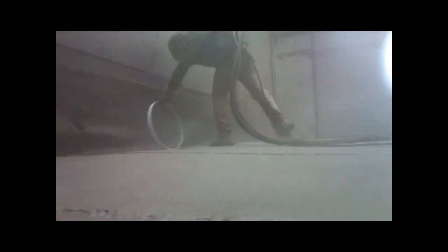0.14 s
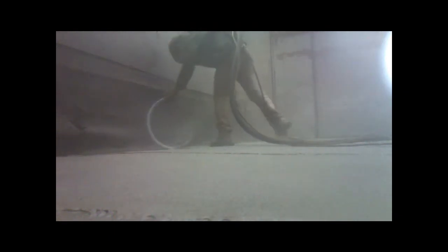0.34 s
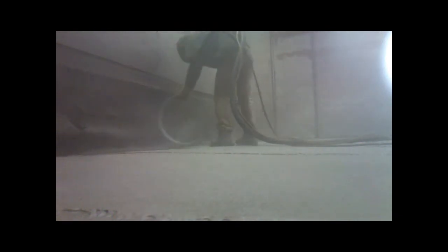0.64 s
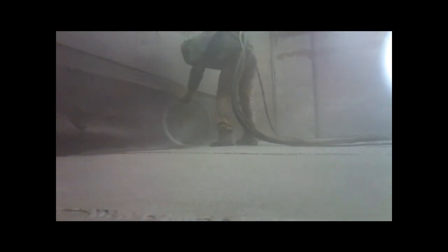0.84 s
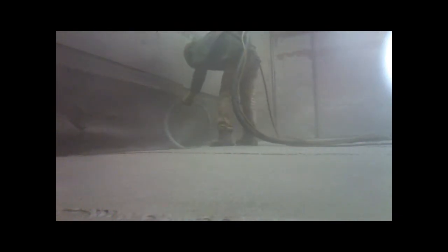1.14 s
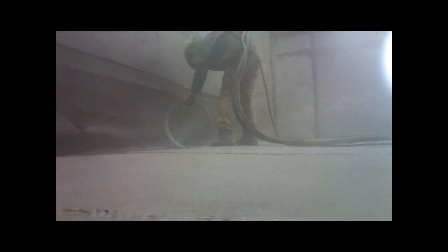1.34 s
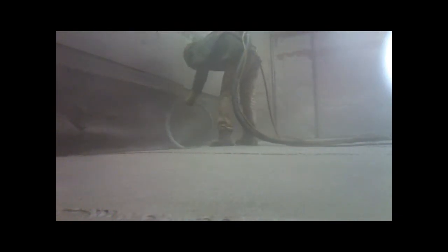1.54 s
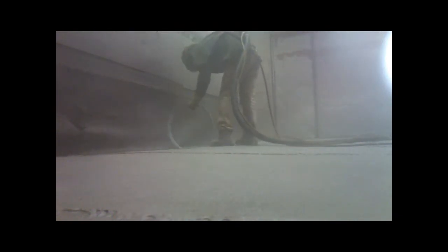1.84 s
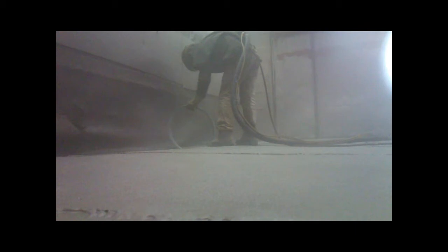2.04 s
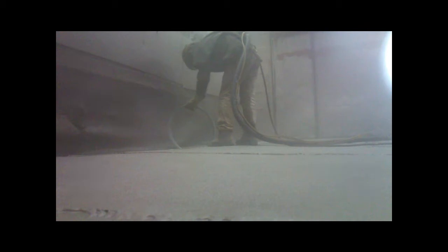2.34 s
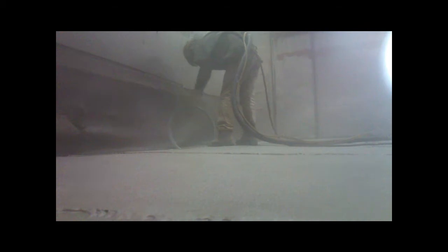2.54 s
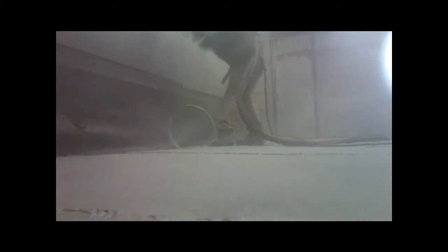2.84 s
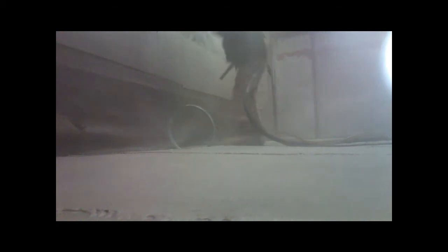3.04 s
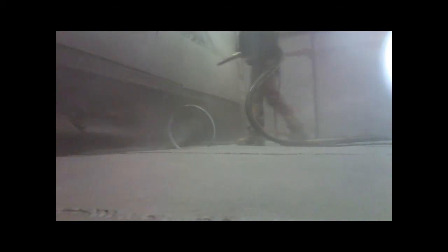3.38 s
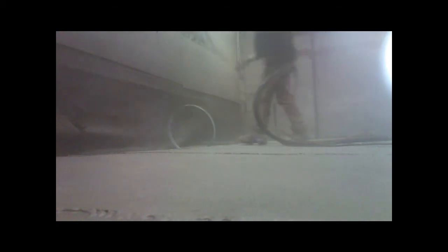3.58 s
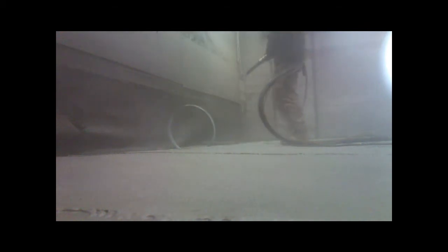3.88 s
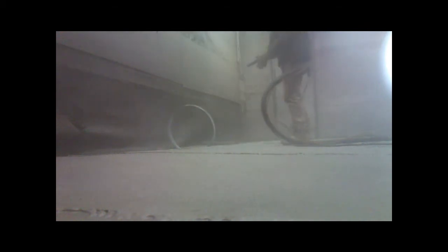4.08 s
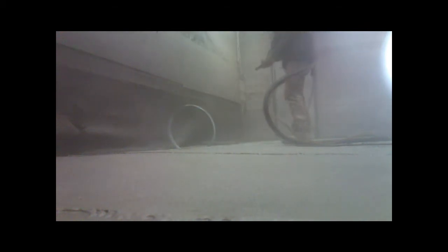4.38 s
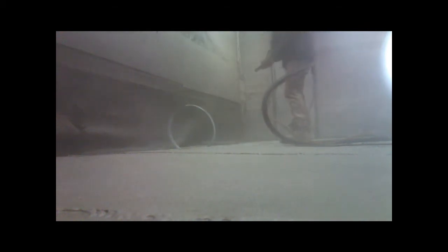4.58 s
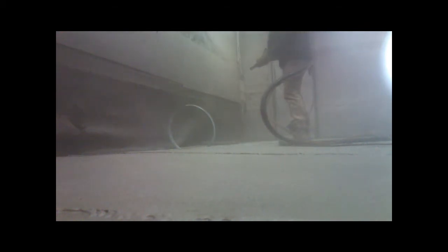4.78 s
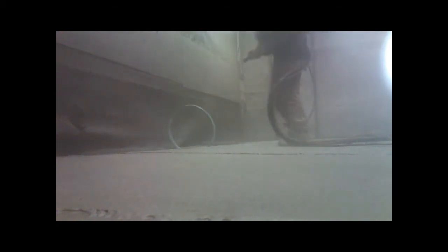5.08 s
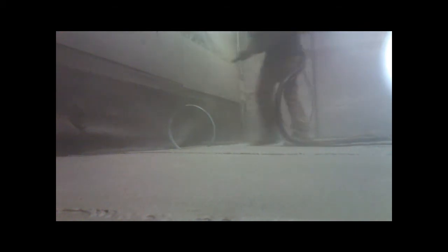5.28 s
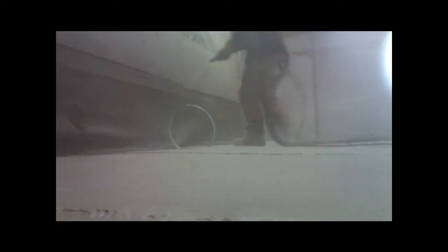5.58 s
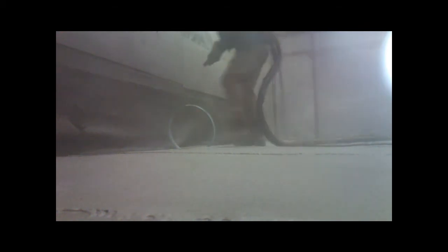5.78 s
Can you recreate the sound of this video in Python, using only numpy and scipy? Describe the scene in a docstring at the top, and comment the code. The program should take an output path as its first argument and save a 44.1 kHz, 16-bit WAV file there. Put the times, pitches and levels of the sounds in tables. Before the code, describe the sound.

Grit blasts against a metal pipe with a harsh, ringing hiss that briefly overloads the microphone. As it drops to a softer, airy spray, the blast booth's ventilation takes over: a rush of air, low booming rumble, wavering fan tones and a low hum. Short, irregular spurts from the nozzle and brief dips break up the noise throughout. The hiss is weakest at the end, and the highest treble is missing.

```python
"""A bright hiss of grit on steel: a worker sandblasts a pipe in a booth, then swings the jet away.
The grit rings the pipe, and while the hiss is loud the recorder's gain control holds the booth down.
As the hiss falls, the extractor comes forward: roaring air, a rumbling duct, fan tones and motor hum.
The whole din throbs unevenly and flutters, and now and then the nozzle spits a slug of grit."""
import sys
import numpy as np
from scipy import signal
from scipy.fft import rfft, irfft
from scipy.io import wavfile
from scipy.ndimage import uniform_filter1d

SR = 44100
rng = np.random.default_rng(int(sys.argv[2]) if len(sys.argv) > 2 else 0)


def to_wav(sig):
    """Store sig (one row per channel, or 1-D mono) as 16-bit WAV at the path in sys.argv[1].

    Samples outside -1..1 are clipped; the rate is SR.
    """
    pcm = np.clip(np.atleast_2d(sig), -1, 1) * 32767
    pcm = np.round(pcm).astype(np.int16)
    wavfile.write(sys.argv[1], SR, pcm.T)  # frames by channels


N = 261072
TIME = np.arange(N) / SR
HZ = np.fft.rfftfreq(N, 1 / SR)

# The jet's sweep. Each row: time in seconds, hiss level in dB, share that hits the pipe from 0 to 1.
JET_SWEEP = [(0, -16.5, 0.85), (.42, -23, 0.87), (.85, -29, 0.9), (1.1, -31, 0.88), (1.75, -34.5, 0.8),
             (2.05, -39, 0.6), (2.33, -39.5, 0.4), (2.6, -41, 0), (2.95, -41, 0.1), (3.02, -38, 0),
             (3.4, -38.5, 0.04), (3.65, -38, 0.03), (4.4, -38, 0.2), (4.66, -37.8, 0.4), (4.82, -41, 0.2),
             (5.08, -40, 0.1), (5.22, -47.5, 0.5), (5.65, -47, 0.8), (5.92, -53, 0.2)]
# The colour of the booth's roar. Each row: frequency in Hz, relative level in dB.
BOOTH_ROAR = [(100, -39.5), (250, -6), (370, -4.5), (520, -3), (640, -1), (690, -0.5), (750, -3.5),
              (880, -1), (915, -4), (960, -4.5), (1130, -5.5), (1280, -9), (1550, -14.5), (2000, -18),
              (2500, -34), (4000, -48)]
# The midrange. Each row: time in seconds, gain of the duct's hollow in dB, lift of the air rush in dB.
MIDRANGE = [(0, -25.5, 1.5), (.33, -28, 0.5), (.55, -35, -2.5), (.85, -29, -1), (1.25, -30, 0.5),
            (1.5, -29.5, -1.5), (1.7, -26.5, 0.5), (2, -34, -.5), (2.3, -30.5, 0.5), (2.85, -32.5, 1),
            (3.3, -28, -0.5), (3.6, -34, -2), (4, -32.5, -.5), (4.55, -29, 0), (4.8, -38.5, 1),
            (5.2, -36, -2), (5.5, -34, -0.5), (5.92, -31, -3)]


def gain_of(db):
    """Decibels to amplitude."""
    return 10 ** (np.asarray(db) / 20)


def unit_rms(x):
    """Scales to rms 1."""
    return x / np.sqrt(np.mean(x ** 2) + 1e-20)


def curves(rows):
    """Each column of a timed table, at every sample."""
    times, *columns = np.transpose(rows)
    return [np.interp(TIME, times, column) for column in columns]


def bell(centre_s, length_s):
    """A smooth rise to 1 and fall, above half height for the given length."""
    return .5 ** ((2 * (TIME - centre_s) / length_s) ** 2)


def resonances(modes):
    """Resonance peaks and dips, in dB at every frequency."""
    return sum(db / (1 + (2 * (HZ - hz) / width) ** 2) for hz, width, db in modes)


def shaped_noise(response):
    """Noise of rms 1 through a frequency response."""
    return unit_rms(irfft(rfft(rng.standard_normal(N)) * response, N))


def noise(spectrum, lift_db=0):
    """Noise of rms 1, coloured by points of frequency and level."""
    hz, db = np.transpose(spectrum)
    colour_db = np.interp(np.log(HZ + 1), np.log(hz), db)
    return shaped_noise(gain_of(colour_db + lift_db))


def wander(rate_hz):
    """A random drift of rms 1, mostly slower than the given rate."""
    return shaped_noise((HZ > rate_hz / 8) / (1 + (HZ / rate_hz) ** 2))


def throb(rate_hz, spread_hz):
    """A loosely regular swing of rms 1 about the given rate."""
    return shaped_noise(1 / (1 + (2 * (HZ - rate_hz) / spread_hz) ** 2))


def low_pass(x, hz):
    """A steep band limit."""
    taps = signal.firwin(181, hz, window=("kaiser", 8), fs=SR)
    return signal.oaconvolve(x, taps[None], "same", axes=1)


def tick():
    """One faint, dry tick, a single sample long."""
    # Each row: time in seconds, level in dB.
    impulses = [(2.094, -28)]
    out = np.zeros(N)
    for at_s, db in impulses:
        out[round(at_s * SR)] = gain_of(db)
    return out


def drone_tones(base_hz, partials, drift_hz, waver, sway_rad, stagger_turns=.0625):
    """Wavering harmonics of one drifting speed, their phases staggered to drone without pulsing."""
    turns = np.cumsum(base_hz + drift_hz * wander(1.5)) / SR + rng.random()
    out = np.zeros(N)
    for order, db in partials:
        wavering = (1 + waver * wander(22)) * np.exp(1j * sway_rad * wander(5.1))
        tone = np.exp(2j * np.pi * (order * turns + stagger_turns * order ** 2))
        out += gain_of(db) * unit_rms((wavering * tone).real)
    return out


def duct_rumble(buffet_db=-0.5):
    """Gusts buffet the duct, and the rumble booms in the booth's low resonances."""
    # The rumble's colour. Each row: frequency in Hz, relative level in dB.
    colour = [(15, -23), (25, -17.5), (33, -18.5), (45, -4.5), (60, -8), (80, -9.5), (105, -3.5), (135, -2),
              (185, -0.5), (260, -5), (340, -9.5), (600, -37.5), (2000, -65)]
    # The booth's resonances. Each row: frequency in Hz, width in Hz, lift in dB.
    booms = [(57, 12, 0.5), (105, 17, 4), (163, 9.4, 4.5), (261.4, 10, 2)]
    # Each row: centre in seconds, swell in dB, length in seconds.
    gusts = [(0.71, 2, .07), (1.12, -1.5, .05), (1.262, 4, .04), (1.8, 0.5, .06), (2.15, 6, 0.071),
             (3.052, 1.5, 0.071), (3.5, 2, .07), (3.86, 2.5, 0.11), (4.092, 0, 0.076), (4.804, 3, 0.069),
             (5.26, 2.5, 0.037)]
    gust_db = buffet_db * wander(5) + sum(db * bell(at_s, length) for at_s, db, length in gusts)
    return gain_of(-27.5 + gust_db) * noise(colour, resonances(booms))


def fan(shaft_hz=81.42, whine_orders=(7, 9, 11)):
    """The fan sings at multiples of its shaft speed; three strong tones swell and fade."""
    # Each row: multiple of the shaft speed, relative level in dB.
    faint_tones = [(5, -43.5), (6, -41), (12, -40.5), (13, -44.5), (16, -44)]
    # Each row: time in seconds, then relative levels of the low, middle and high tone in dB.
    whine = [(0, -45, -39, -47), (.3, -39, -40, -33), (.55, -43, -38.5, -38), (.92, -41, -31, -28.5),
             (1.12, -32.5, -29, -32), (1.45, -38, -30.5, -32.5), (2.05, -33, -29.5, -34.5),
             (2.3, -31.5, -26.5, -27.5), (2.47, -33.5, -28, -36), (2.65, -30.5, -27.5, -33),
             (3.05, -35, -27.5, -31), (3.3, -29, -32, -37), (3.6, -35, -28, -34.5), (4.0, -33, -30, -32),
             (4.3, -35.5, -31.5, -32), (4.48, -32, -27, -32), (4.66, -34, -31, -37),
             (4.88, -31.5, -29.5, -29.5), (5.25, -33.5, -34.5, -31), (5.52, -43, -30.5, -38),
             (5.75, -34, -30, -41), (5.92, -44, -24, -47)]
    partials = faint_tones + list(zip(whine_orders, curves(whine)))
    return gain_of(-1.1) * drone_tones(shaft_hz, partials, drift_hz=.02, waver=.06, sway_rad=.2)


def motor(mains_hz=59.33):
    """The fan's motor hums at even multiples of the mains frequency."""
    # Each row: multiple of the mains frequency, relative level in dB.
    hum = [(2, -34.8), (4, -42)]
    return drone_tones(mains_hz, hum, drift_hz=.03, waver=.3, sway_rad=.3)


def extractor(surge_db, tone_share=0.56):
    """Air roars through the booth and rings the duct; fan and motor take only a share of each surge."""
    # The low end. Each row: time in seconds, gain of the hum in dB, gain of the rumble in dB.
    low_end = [(0, -17, -1), (.5, -9, -1.5), (.72, 3.5, -3.5), (.9, -17, 1), (1.15, 6, -0.5), (1.5, 0, 0),
               (1.8, 0, 3), (2.15, 3.5, -0.5), (2.55, 2, -0.5), (2.78, -7, 3.5), (2.97, -2, 3.7),
               (3.42, 4, .5), (3.65, -10, -1), (4.15, 1, 1), (4.38, 3.5, -1), (4.7, 2.5, 2),
               (4.95, -2.5, .5), (5.27, 6.5, 0), (5.45, -7, 2.5), (5.65, 6, -1.5), (5.92, -4, 3.5)]
    # The duct's hollow resonance. Each row: frequency in Hz, relative level in dB.
    hollow = [(600, -39.5), (700, -18.5), (760, -1), (820, 1.5), (870, -4.5), (940, -6), (1100, -42)]
    hum_db, rumble_db = curves(low_end)
    hollow_db, _ = curves(MIDRANGE)
    roar = gain_of(-26) * noise(BOOTH_ROAR) + gain_of(hollow_db) * noise(hollow)
    rumble = gain_of(rumble_db) * duct_rumble()
    drone = fan() + gain_of(hum_db) * motor()
    return gain_of(surge_db) * (roar + rumble) + gain_of(tone_share * surge_db) * drone


def unsteadiness(halved_at_db=-18):
    """How much throb and flutter remains, from 0 to 1: the sound is smoother while the hiss is loud."""
    hiss_db, _ = curves(JET_SWEEP)
    return 1 / (1 + gain_of(hiss_db - halved_at_db) ** 2)


def level_wobble(level_flutter_db=0.8):
    """An uneven throb, a fine, fast flutter and brief lulls in the level of the whole sound, in dB."""
    # Each row: rate in Hz, spread of the rate in Hz, depth in dB.
    throbs = [(2.5, 1.5, 0.07), (7.5, 2.6, 0.26)]
    # Each row: centre in seconds, dip in dB, length in seconds.
    lulls = [(0.554, -2, 0.036), (1.048, -3, 0.053), (1.19, -4.5, 0.029), (1.308, -6.5, 0.039),
             (1.439, -5, 0.03), (1.543, -3, 0.032), (1.763, -1, 0.014), (2.062, -5.5, 0.013),
             (2.114, -6.5, 0.022), (2.527, -3.5, 0.072), (2.802, -2.5, 0.022), (2.944, -7, 0.019),
             (3.077, -5, 0.016), (3.168, -1.5, 0.026), (3.958, -1, 0.041), (4.206, -1.5, 0.017),
             (5.144, -1.5, .025), (5.72, -2.5, 0.03), (5.798, -5.5, 0.018)]
    fast_db = level_flutter_db * wander(51)
    throb_db = sum(db * throb(rate, spread) for rate, spread, db in throbs)
    lull_db = sum(db * bell(at_s, length) for at_s, db, length in lulls)
    return (fast_db + throb_db) * unsteadiness() + lull_db


def spits():
    """The swell of the rush and of the hiss, in dB, as each slug of grit leaves the nozzle."""
    # Each row: centre in seconds, swell of the rush in dB, swell of the hiss in dB, length in seconds.
    slugs = [(0.052, 3, 3.5, 0.037), (0.366, 2, 2, 0.089), (0.533, 6, 3, 0.014), (0.692, 4.5, 2.5, 0.036),
             (0.723, 1.5, 3, 0.026), (0.79, 4.5, 4.5, 0.044), (0.973, 1.5, 1.5, 0.016),
             (1.085, 2.5, 2, 0.027), (1.268, 0, 2, 0.042), (1.32, 4.5, 3.5, .05), (1.485, 1.5, -0.5, 0.11),
             (1.605, 3.5, 2.5, 0.036), (1.697, 4.5, 1, 0.028), (1.729, 5.5, 4.5, 0.013),
             (1.93, 1.5, 2.5, 0.033), (2.137, 7, 5.5, 0.18), (2.22, 3, 1, 0.065), (2.305, 6.5, 6.5, 0.041),
             (2.348, 5, 3.5, 0.036), (2.575, 2.5, 2, .04), (3.105, 2.5, -1, 0.026), (3.5, 3, 1.5, 0.052),
             (3.648, 3, 2.5, 0.037), (3.78, 4, 4, 0.019), (4.044, 3.5, 3, 0.026), (4.133, 5.5, 5, 0.043),
             (4.404, 1.5, 2, 0.035), (4.886, 1.5, 3.5, 0.074), (5.006, 6.5, 7.5, 0.011),
             (5.385, 2, 0, 0.028), (5.532, 3.5, 3, 0.056), (5.671, 4.5, 4, .055), (5.77, 5, 3, 0.044)]
    return sum(np.outer([rush_db, hiss_db], bell(at_s, length))
               for at_s, rush_db, hiss_db, length in slugs)


def echo_ripple(depth_db, count=40):
    """Reflections within the first 40 ms comb the spectrum, in dB at every frequency."""
    echoes = np.zeros(N)
    echoes[rng.integers(round(.002 * SR), round(.04 * SR), count)] = rng.choice([-1., 1.], count)
    return depth_db * unit_rms(rfft(echoes).real)


def moving_noise(spectrum, ripple_db, lift_db=0, positions=7):
    """Noise that crossfades from one pattern of reflections to the next as the nozzle moves."""
    place = np.linspace(0, positions - 1, N)
    out = np.zeros(N)
    for position in range(positions):
        fade = np.sqrt(np.maximum(1 - abs(place - position), 0))
        out += fade * noise(spectrum, lift_db + echo_ripple(ripple_db))
    return out


def jet(swell_db, sizzle_db, feed_db=0.79, rush_follows=0.55, hiss_ref_db=-36.5):
    """Air and grit leave the nozzle and stir the booth; the share that strikes the pipe rings it."""
    # The hiss of grit on steel. Each row: frequency in Hz, relative level in dB.
    grit_on_pipe = [(1200, -24), (2200, -5), (2700, -0.5), (3150, -0.1), (3450, 4), (3900, 2), (4300, 3),
                    (4750, 1.5), (5200, 1.5), (5700, 0.5), (6300, 0), (7200, -4.5), (7600, -14)]
    # The pipe's ringing peaks and one dip. Each row: frequency in Hz, width in Hz, lift in dB.
    pipe_modes = [(1845, 70, 16), (3130, 130, 6), (3280, 50, 3.5), (3400, 120, -3), (3730, 80, 2.5),
                  (4700, 110, 4.5), (4990, 90, 3), (5227, 30, 7), (6131, 24, 5)]
    # The hiss in open air. Each row: frequency in Hz, relative level in dB.
    free_jet = [(1500, -23), (2600, -13), (3400, -6), (4000, -4), (4600, -4), (5100, 0), (5650, -2.5),
                (6300, 1), (6700, -0.5), (7250, 0.5), (7600, -11.5)]
    # The lower rush of air under the hiss. Each row: frequency in Hz, relative level in dB.
    air_rush = [(600, -19.5), (1200, -1.5), (1500, 0), (1800, 0), (2100, -0.5), (2350, -5.5), (2800, -6),
                (3150, -6.5), (3700, -14), (5000, -25), (8000, -52.5)]
    hiss_db, aim = curves(JET_SWEEP)
    _, lift_db = curves(MIDRANGE)
    aim = np.clip(aim, 0, 1)
    on_pipe = moving_noise(grit_on_pipe, ripple_db=1.5, lift_db=resonances(pipe_modes))
    in_air = moving_noise(free_jet, ripple_db=2.5)
    hiss = np.sqrt(aim) * on_pipe + np.sqrt(1 - aim) * in_air
    rush_db = -33.5 + lift_db + rush_follows * (hiss_db - hiss_ref_db)
    rush = gain_of(rush_db + swell_db) * moving_noise(air_rush, ripple_db=1.5)
    feed = gain_of(feed_db * unsteadiness() * wander(45))  # grit comes unevenly down the hose
    roar = gain_of(-8.5) * noise(BOOTH_ROAR)
    return feed * (gain_of(hiss_db + sizzle_db) * (hiss + roar) + rush)


def gain_control(x, hold_db=-21.5, listen_s=0.27):
    """Turns the sound down by as much as its running level exceeds the held level."""
    power = uniform_filter1d((x ** 2).mean(0), round(listen_s * SR))
    level_db = 10 * np.log10(abs(power) + 1e-12)
    return x * gain_of(-np.maximum(level_db - hold_db, 0))


def scene():
    """Jet and extractor surge together; both channels are alike."""
    wobble_db = level_wobble()
    swell_db, sizzle_db = spits()
    booth_surge_db = 0.94 * wobble_db + 0.8 * swell_db  # the booth takes most of each throb and spit
    din = jet(swell_db, sizzle_db) * gain_of(wobble_db) + extractor(booth_surge_db)
    return np.array([din, din])


def record(dry, overload=.34, band_hz=7650):
    """Loud hiss overloads the microphone; a narrow-band recorder holds the level."""
    saturated = dry / (1 + (dry / overload) ** 8) ** (1 / 8)
    held = low_pass(gain_control(saturated), band_hz)
    return low_pass(held + tick(), 16000)  # the tick reaches above the recorder's band


dry = scene()
out = record(dry)
to_wav(out)
```